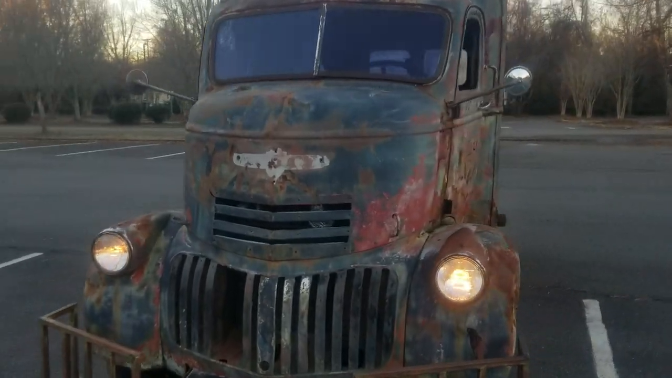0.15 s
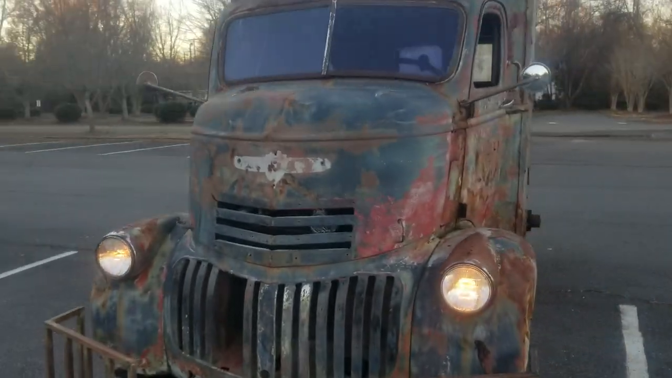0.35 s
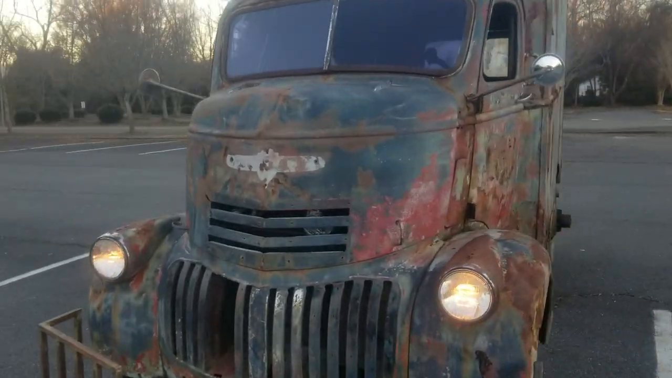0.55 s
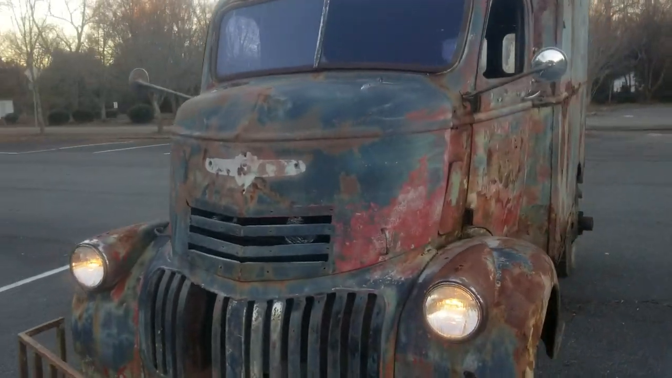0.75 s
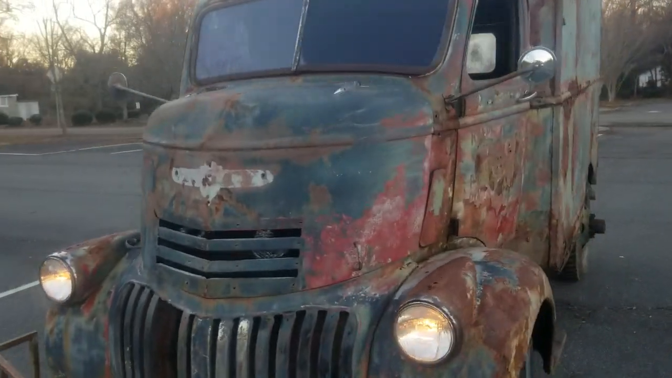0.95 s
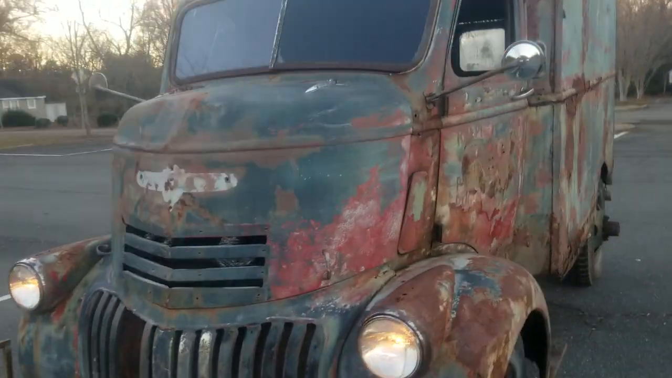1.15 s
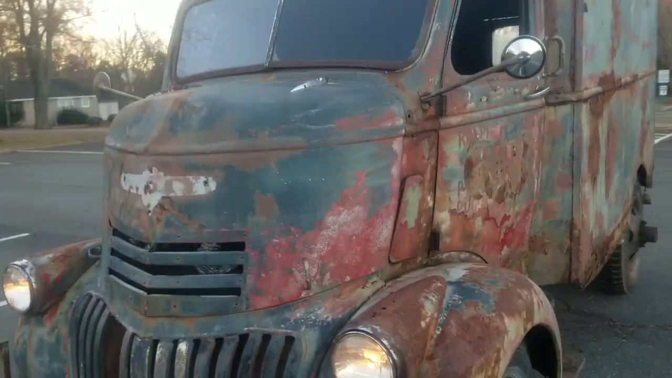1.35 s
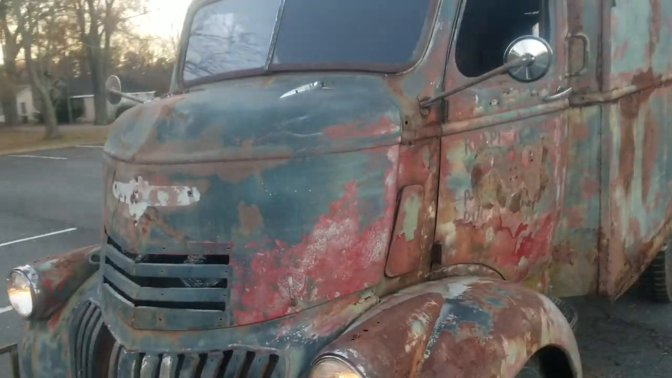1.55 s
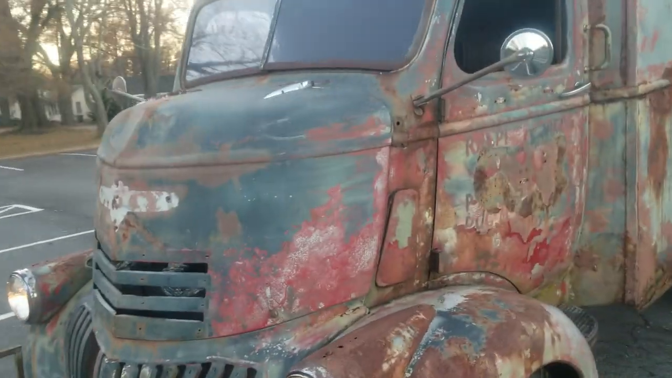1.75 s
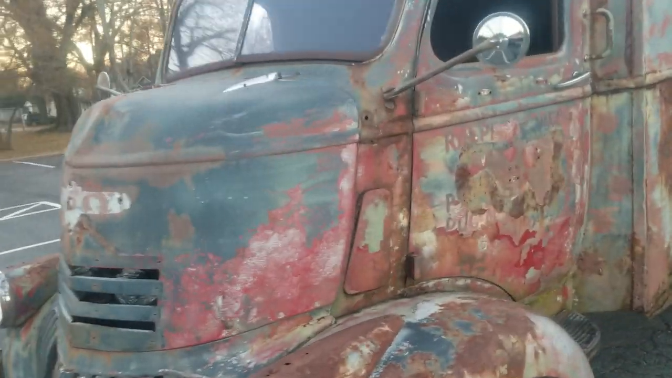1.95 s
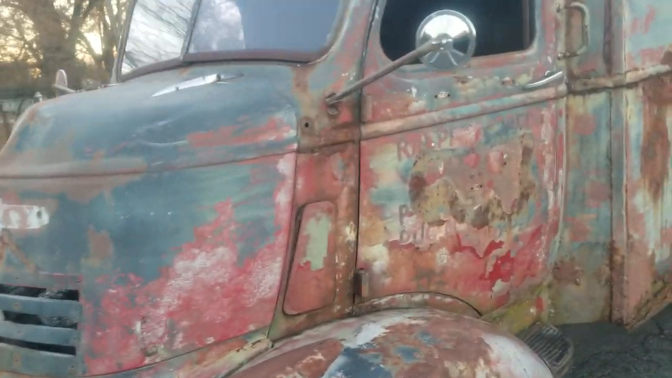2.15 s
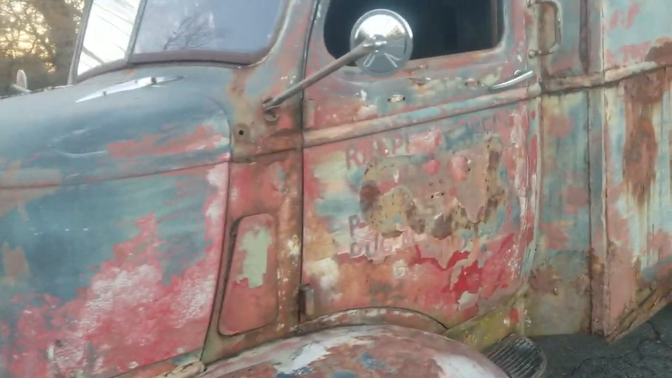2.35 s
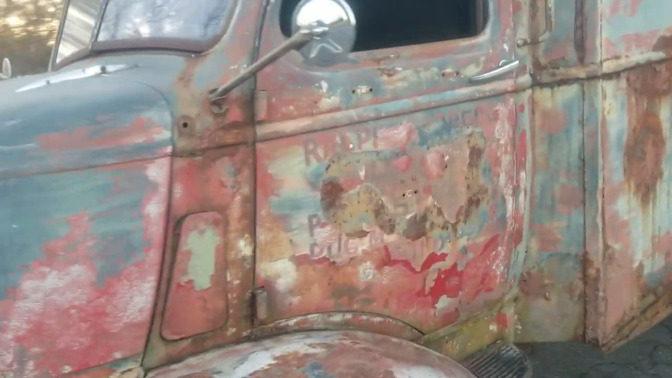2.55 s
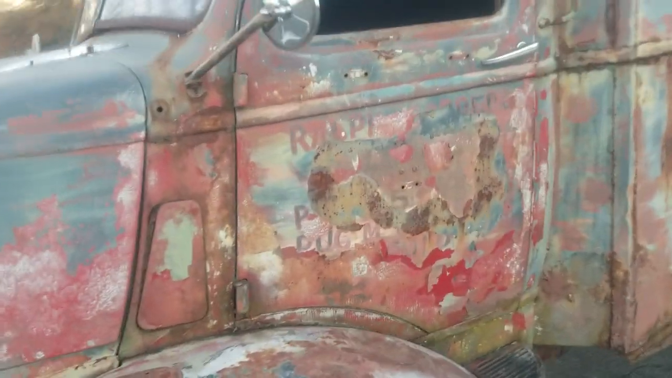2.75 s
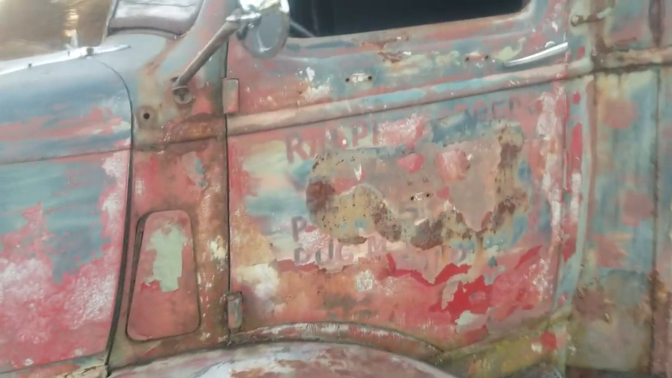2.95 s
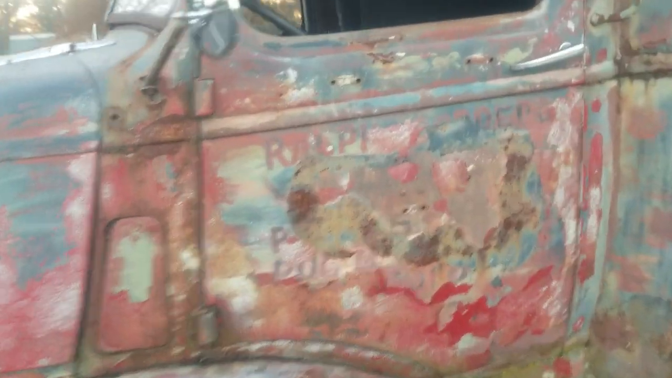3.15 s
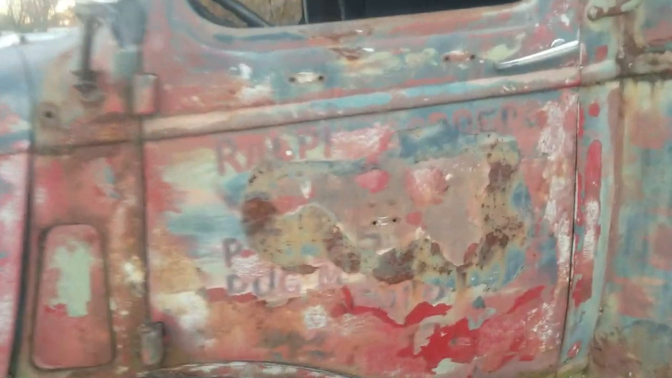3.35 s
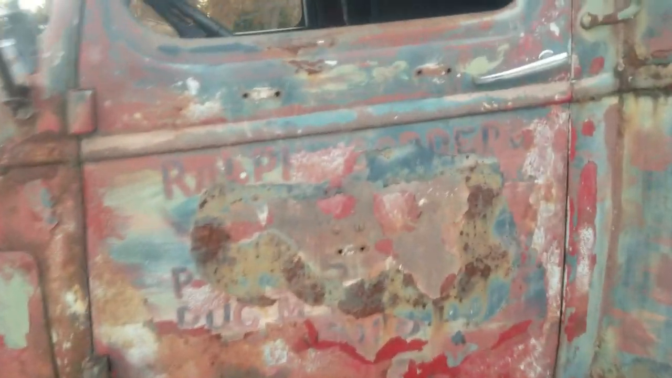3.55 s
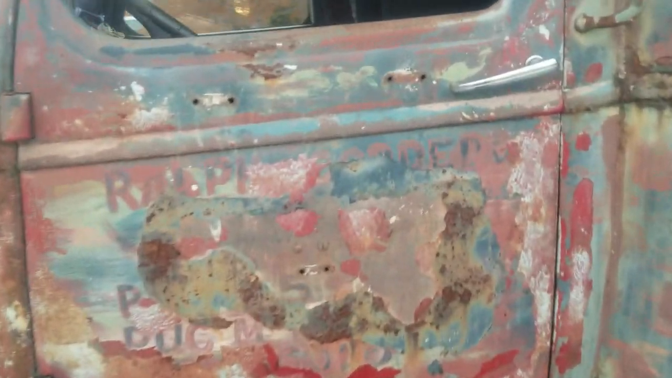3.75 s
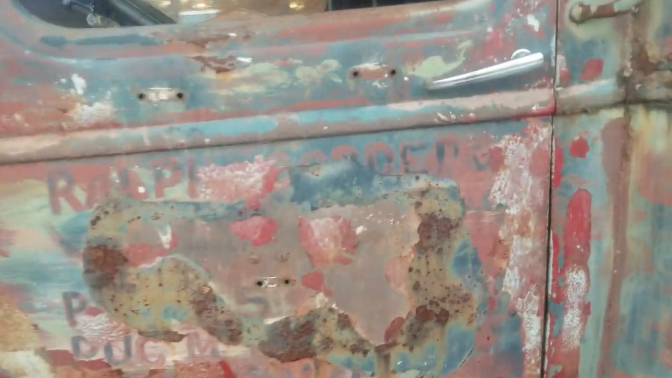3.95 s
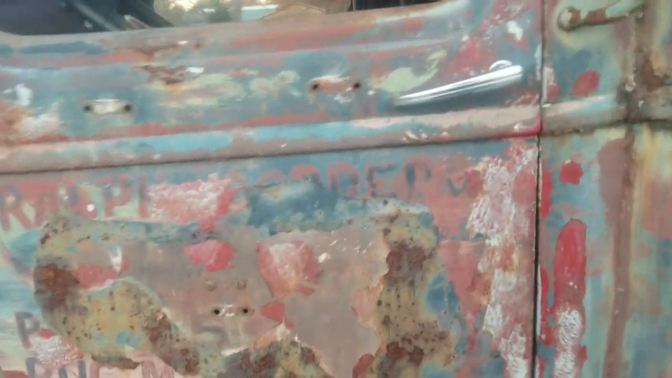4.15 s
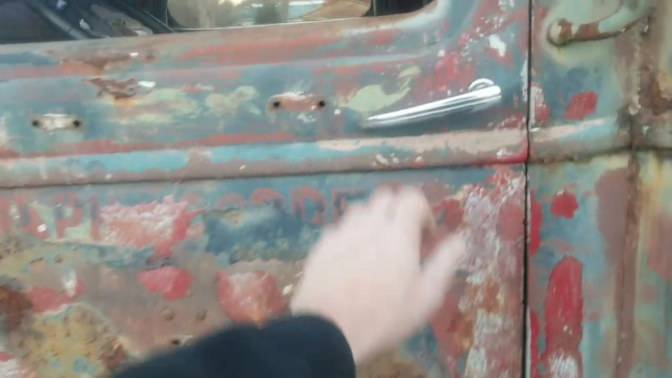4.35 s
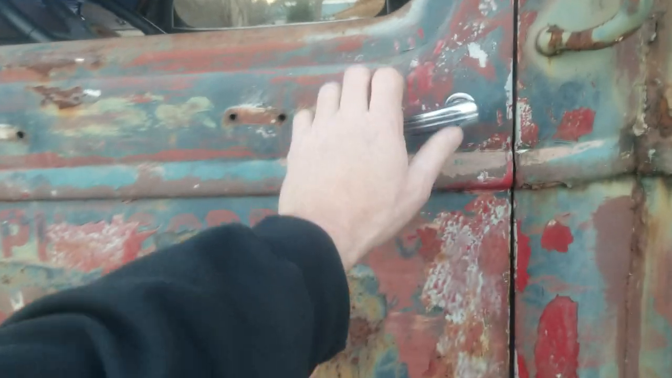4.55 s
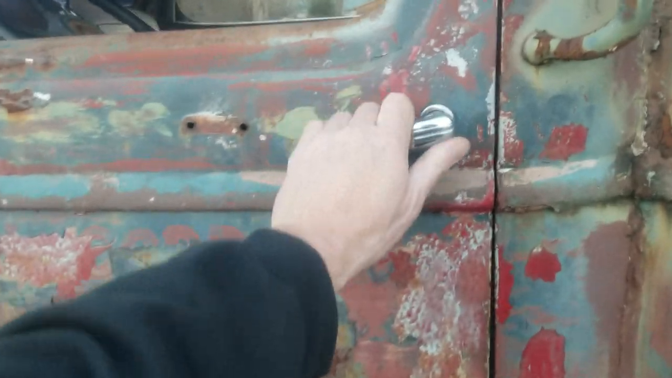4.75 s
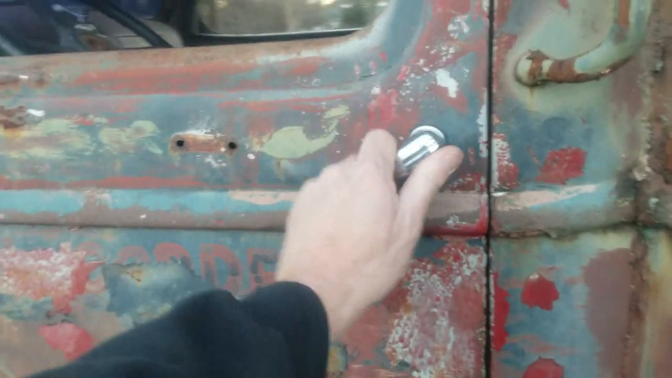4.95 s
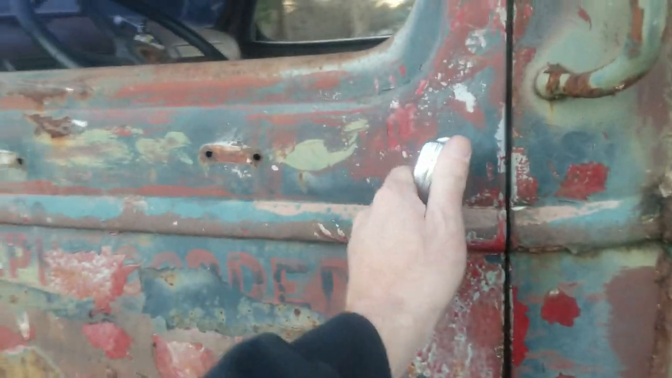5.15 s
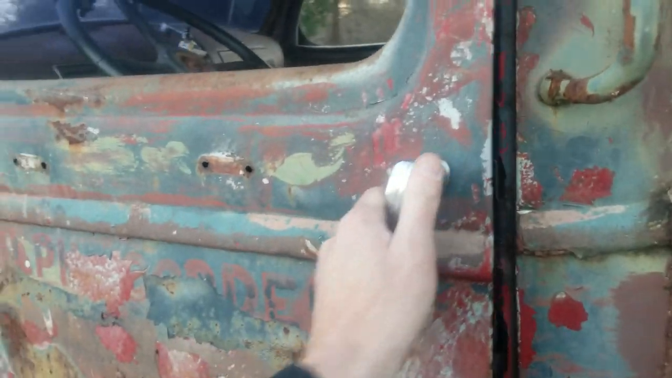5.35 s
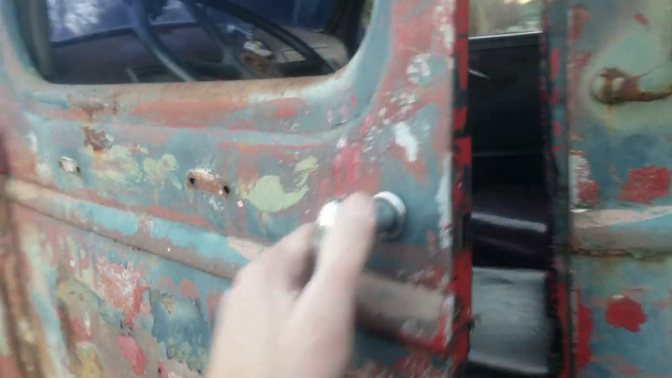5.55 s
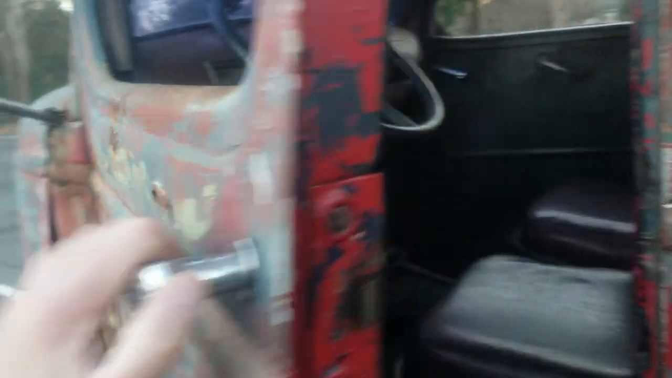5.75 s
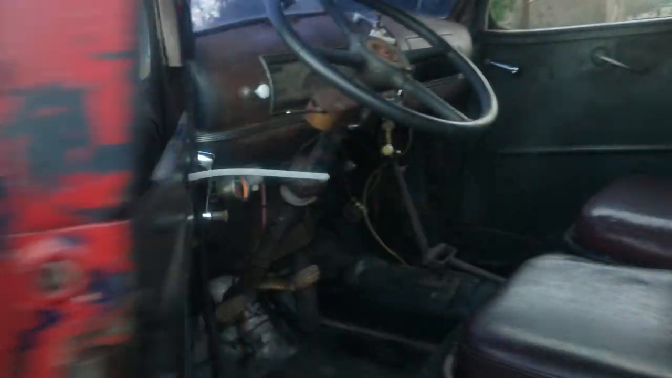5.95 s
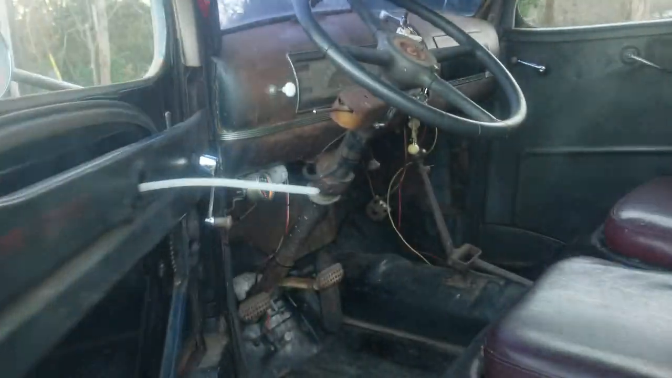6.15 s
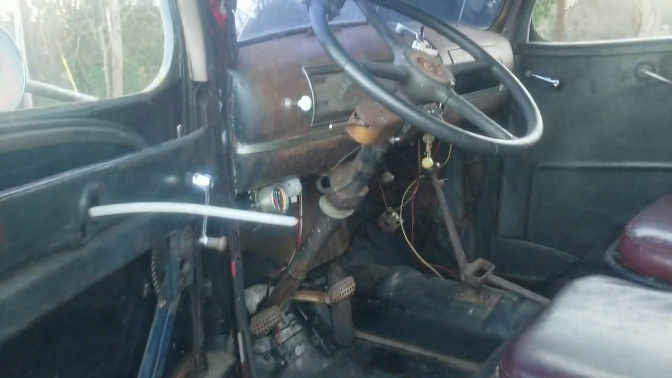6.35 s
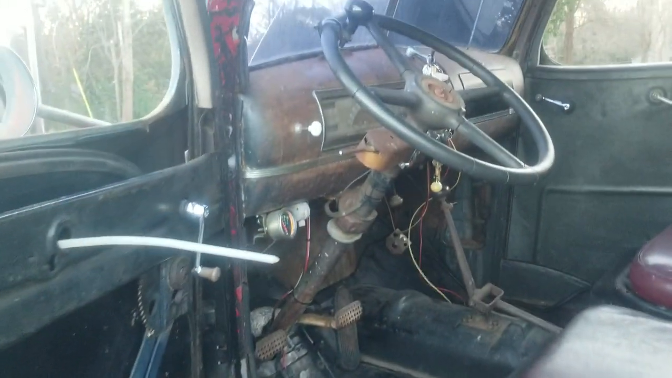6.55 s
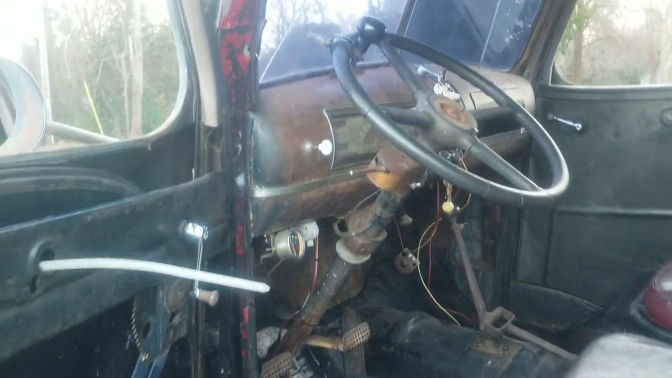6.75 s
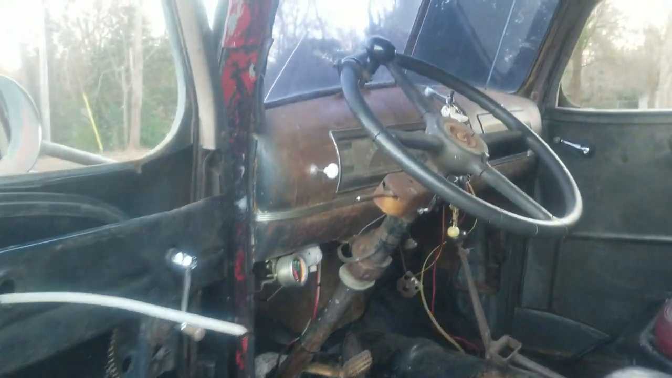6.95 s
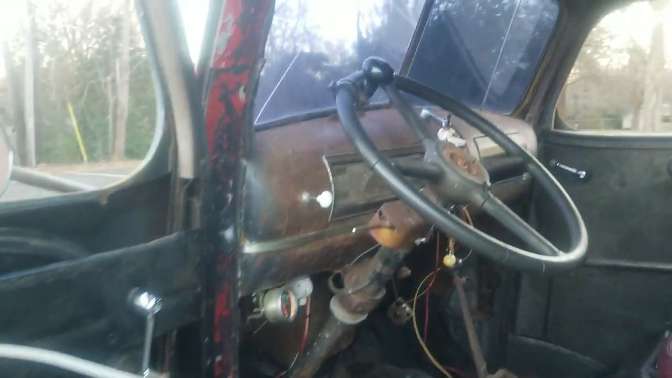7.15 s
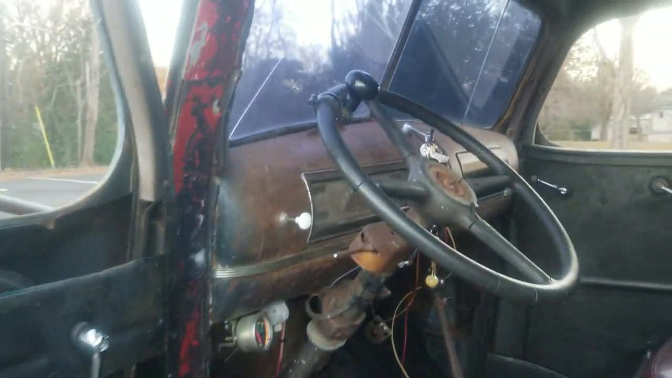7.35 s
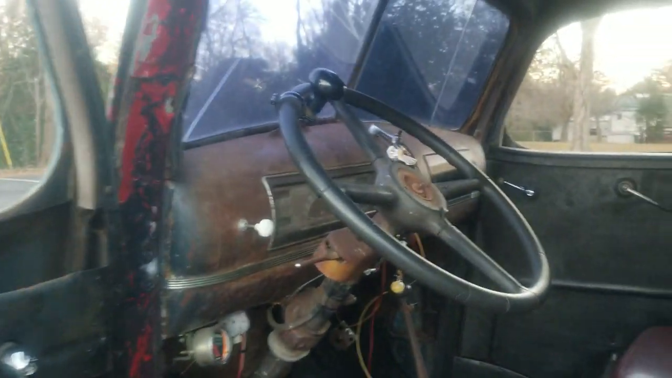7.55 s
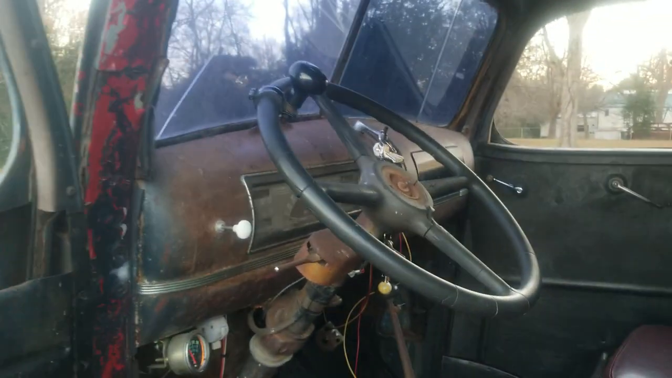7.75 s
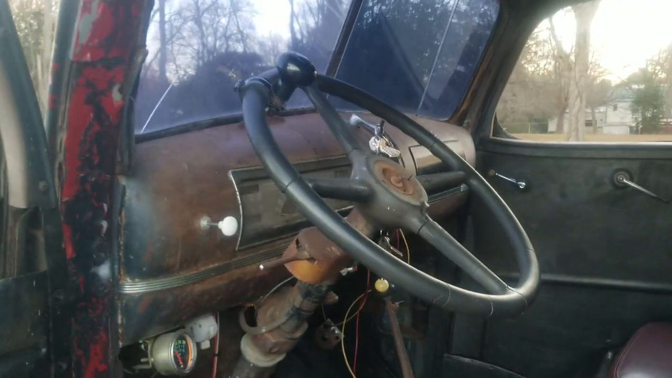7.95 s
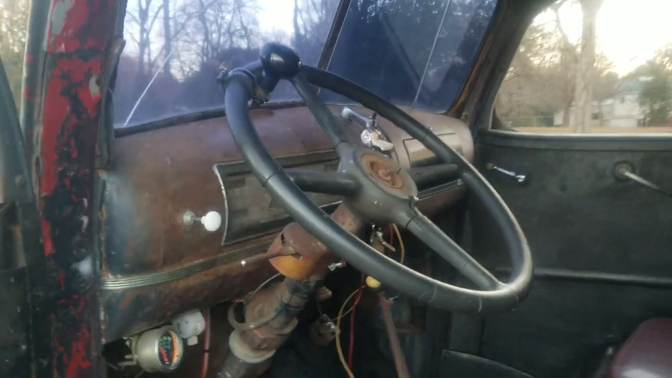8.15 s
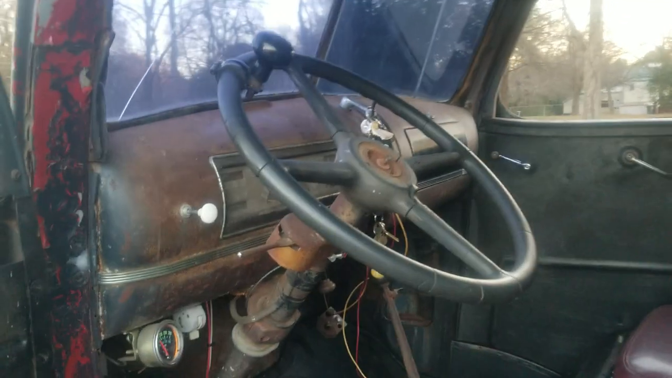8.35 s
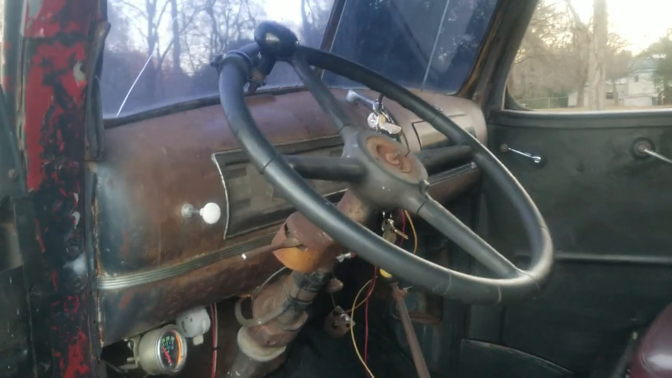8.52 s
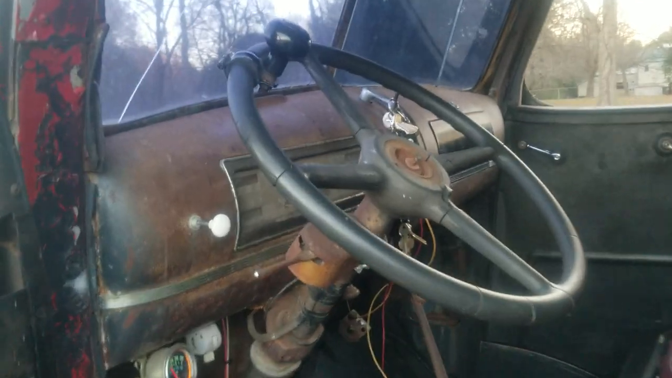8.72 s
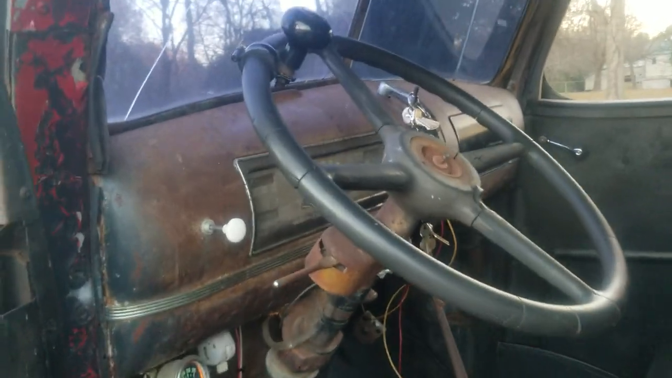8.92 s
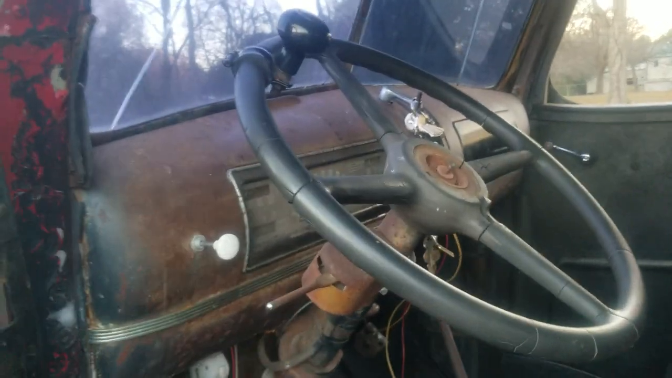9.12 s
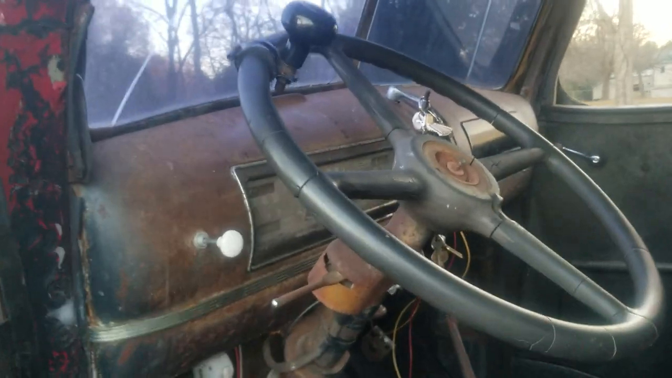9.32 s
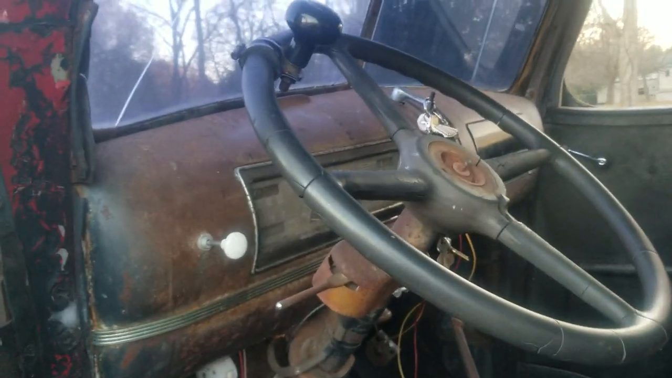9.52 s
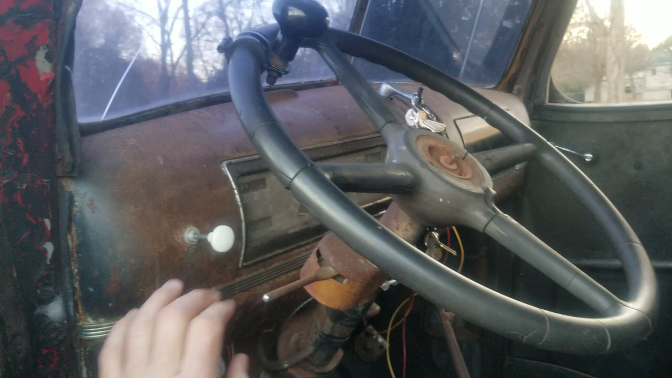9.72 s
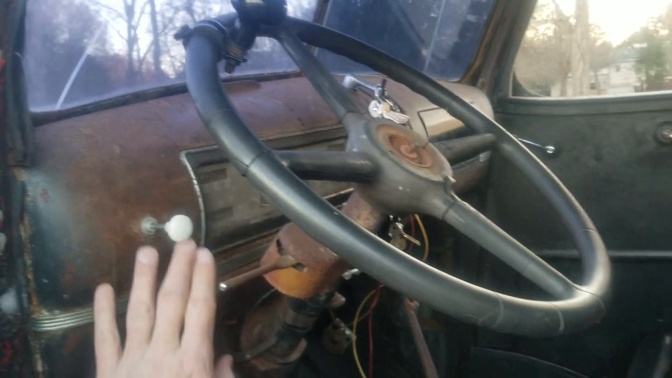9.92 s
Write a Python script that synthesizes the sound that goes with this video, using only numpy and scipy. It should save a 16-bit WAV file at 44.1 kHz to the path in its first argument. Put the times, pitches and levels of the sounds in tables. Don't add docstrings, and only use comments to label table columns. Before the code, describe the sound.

Quiet open car park with soft low traffic rumble, gusty bass and faint airy hiss throughout. A distant engine hum rises from 0 to 3 s, shifts down in pitch at about 3.1 s, climbs again until 7.7 s, then fades into a weak low boom and drone. Faint footsteps at 0.8 and 2.5 s. At 4.4 s, close up, a hand touches the handle: a cluster of small rattles and sharp dry clacks with a short rusty scrape. A loud click at 4.93 s, a springy tick at 5.06 and a second pull at 5.12. At 5.25 s the latch releases with heavy, hollow sheet-metal thuds and bounces; hinges grind until a hard knock at 5.78 and a tiny squeak. Soft rubbing and ticks from 6.2. A sill plate clacks at 7.92, a pedal ticks at 8.62, seat rails snap at 9.02 and 9.38, and a dull knock follows at 9.74 amid rubbing.

```python
import sys
import numpy as np
from scipy import signal
from scipy.fft import rfft, irfft, next_fast_len
from scipy.io import wavfile
from scipy.ndimage import uniform_filter1d

SR = 44100
rng = np.random.default_rng(int(sys.argv[2]) if len(sys.argv) > 2 else 0)


def digitize_waveform(pressure):
    field = np.atleast_2d(pressure).T
    bounded = np.clip(field, -1, 1)
    quanta = np.round(bounded * 32767).astype(np.int16)
    wavfile.write(sys.argv[1], SR, quanta)


def elevation(decibels):
    levels = np.asarray(decibels, float)
    return 10 ** (levels / 20)


N = 440118

# start_s, peak_db, body_db, fizz_db, t60_s (body and fizz relative to the peak)
GRIP_HITS = [
    (4.3862, -37.5, 8, -3, 0.083),
    (4.3973, -37, -9, -34, 0.063),
    (4.4049, -32, -3, -26, 0.071),
    (4.4124, -34, -16, -38, 0.058),
    (4.419, -34.5, -2, -34, 0.056),
    (4.4243, -21, -34, -5, 0.043),
    (4.4335, -24, -9, -5, 0.032),
    (4.44, -29.5, -22, 0.5, 0.015),
]
HANDLE_HITS = [
    (4.9125, -41, 14, -32, .04),
    (4.9203, -42.5, 10, -23, 0.028),
    (4.9243, -32.5, 6, -27, 0.027),
    (4.9338, -20.5, 0.5, -12, 0.042),
    (4.944, -29, 5, -26, 0.03),
    (4.953, -32.5, 1.5, -46, 0.15),
    (5.118, -33, 5.5, 3, 0.034),
    (5.125, -34.5, 4, 3, 0.051),
]
KEEPER_HITS = [
    (5.059, -31, -15, -25, .05),
    (5.0655, -31.5, -11, -17, 0.07),
    (5.075, -35.5, -8, -25, 0.081),
]
LATCH_HITS = [
    (5.251, -34, 10.5, -17, 0.044),
    (5.267, -29, 4.5, -2, 0.045),
    (5.282, -32.5, 6, -29, 0.087),
    (5.317, -38.5, -3, -32, 0.046),
    (5.355, -41, 3, -28, 0.028),
]
STOP_HITS = [
    (5.776, -36, 1, -30, .03),
    (5.781, -26, 0.5, -2.5, 0.03),
    (5.786, -21, -3, -14, 0.09),
]
SILL_HITS = [
    (7.8663, -51, -8, -2, .05),
    (7.8733, -47.5, 5, -4, 0.22),
    (7.9045, -40, -33, -33, 0.063),
    (7.9128, -32, -24, 0, 0.035),
    (7.9185, -28, -9, 1, 0.019),
    (7.9239, -31.5, -24, -2, 0.048),
    (7.9331, -53, -15, -1, .044),
    (7.9674, -52, 16, -34, 0.28),
]
PEDAL_HITS = [
    (8.5597, -57, 2, -10, .02),
    (8.5896, -53, -9, 4, .02),
    (8.608, -48, -8, -17, .015),
    (8.6181, -37, -8, -1, 0.02),
    (8.626, -37.5, -15, -12, 0.017),
    (8.638, -45, -20, -12, .015),
    (8.642, -43, -19, -3, 0.0098),
    (8.6924, -47.5, -22, -6, 0.011),
    (8.7577, -54.5, -23, -3, 0.0088),
]
SEAT_HITS = [
    (9.009, -42, 11, -25, 0.018),
    (9.0158, -26, -13, 12, .03),
    (9.024, -31.5, 7, -19, 0.11),
    (9.0834, -44, 16, -17, 0.039),
    (9.1318, -54, 5, -13, 0.047),
    (9.2889, -63, 5, -10, .03),
    (9.2949, -55.5, 17, -12, .03),
    (9.3758, -31.5, -6, 8.5, 0.041),
    (9.383, -36, 3, -16, 0.082),
    (9.4705, -59, 17, -10, .03),
]
CAB_HITS = [(6.2255, -69, -5, 9, .04), (6.261, -63, 21.5, -10, .08), (6.6456, -48, -20, -3, 0.022),
            (6.6541, -50, -20, -11, 0.037), (6.7179, -54, 10, 3, .03), (6.7299, -51, 2, -8, 0.033),
            (8.939, -49, 18, 3, .12), (8.945, -61, -5, 10, 0.024), (9.654, -59, 22, -40, .12),
            (9.6905, -54, 17, -33, 0.045), (9.696, -52, 19, -33, 0.2), (9.7355, -38, 10, -33, 0.15)]
STEP_HITS = [
    (.805, -53, 3, 4, .025),
    (2.519, -57, 2, -4, .04),
    (2.59, -63, -8, -8, .03),
    (3.092, -63, -10, -14, .03),
    (3.871, -61, -10, -8, .03),
]

# frequency_hz, width_hz, level_db
SPINDLE_MODES = [(760, 200, 14), (1120, 200, -20), (1480, 160, 4), (1740, 410, 1), (2800, 380, -8),
                 (4000, 650, -17)]
LEVER_MODES = [(727, 180, -3), (890, 49, -4), (1127, 84, -3.5), (1304, 82, -4), (1540, 200, 6),
               (1980, 83, -1), (2120, 260, 2.5), (2500, 200, 0), (3360, 120, -4), (3600, 140, 0.5),
               (4100, 910, -5)]
SPRING_MODES = [(754, 200, -7), (1150, 220, -9), (1423, 33, 1), (1540, 61, 3), (2820, 100, -3),
                (3300, 130, -11), (3590, 94, -5), (4530, 470, -8)]
CATCH_MODES = [(695, 425, 12.5), (1300, 510, 6), (1750, 230, 0.5), (2800, 520, 9), (3470, 260, 9.5),
               (3870, 350, 2.5), (4760, 1100, -0.5)]
STRAP_MODES = [(788, 140, 4.5), (340, 34, -2.5), (1050, 22, -9), (1500, 890, -5), (1960, 1200, 12.5),
               (2570, 270, 2), (3194, 620, 3), (4360, 490, 5)]
PLATE_MODES = [(660, 340, 11), (1030, 160, -6.5), (1660, 87, 5.5), (2370, 200, 0), (2750, 130, 2),
               (3920, 720, -1)]
ARM_MODES = [(790, 370, 1), (1150, 270, 6), (1340, 250, 2.5), (1750, 1050, 6.5), (2680, 280, -6),
             (3870, 1600, -2)]
RAIL_MODES = [(335, 45, -1.5), (646, 68, 0), (855, 56, -2.5), (1150, 220, -1), (1760, 660, -13),
              (2720, 210, 2.5), (3540, 700, 0), (5020, 280, -1.5), (7400, 350, -6)]
TRIM_MODES = [(704, 170, 3), (1150, 440, -4), (1670, 320, -6), (2600, 300, 1.5), (3370, 1300, 0.5),
              (4400, 1200, -3)]
SOLE_MODES = [(850, 900, 0), (1300, 600, 4), (1920, 400, 11), (3900, 900, 4)]
# frequency_hz, width_hz, level_db
PANEL_MODES = [(123, 67, 0), (158.2, 8.9, -0.5), (207, 17, -7.5), (287, 24, -9.5), (366, 39, -8),
               (451, 140, -12.5)]
# frequency_hz, width_hz, level_db
FIZZ_MODES = [(7640, 1900, 12), (8400, 150, 4), (11650, 1500, -2.5), (14800, 1100, -14)]

# start_s, peak_db, pitch_hz, t60_s
KNOCKS = [(4.3965, -26, 1500, .03), (4.4052, -25, 1550, .03), (4.4203, -23, 1500, .02),
          (4.4287, -13.5, 1580, 0.028), (4.436, -26, 1480, .018), (4.3882, -27, 1500, .02),
          (4.9343, -14, 2560, .003), (4.941, -19, 1150, .02), (5.2515, -28, 3600, 0.028),
          (8.6173, -28, 1450, .02), (8.643, -32, 1450, .015), (4.427, -20, 1490, 0.011),
          (4.4334, -9, 1500, .011), (4.9336, -12, 1390, 0.0062), (4.9365, -25, 1460, .008),
          (5.066, -39, 1440, 0.054), (5.066, -37, 2820, .06), (5.2675, -24.5, 3580, 0.027),
          (5.281, -28, 3600, 0.027), (5.3165, -37, 3600, .03), (5.3545, -44, 3590, 0.026),
          (7.9185, -18, 1660, 0.028), (7.9187, -18, 2750, 0.017), (7.914, -29, 2500, .015),
          (7.925, -20, 1720, 0.018), (9.0173, -26, 2650, 0.011)]
# start_s, peak_db
THUDS = [(4.934, -35), (5.116, -29), (5.245, -11), (5.253, -15.5), (5.26, -13.5), (5.266, -29),
         (5.281, -17.5), (5.296, -22), (5.314, -24), (5.354, -30), (5.373, -33), (5.7813, -34.5),
         (8.6188, -32), (9.023, -35), (9.738, -32)]
# start_s, peak_db
RAPS = [
    (2.519, -28),
    (4.934, -23),
    (4.94, -25),
    (4.97, -24),
    (4.989, -28),
    (5.026, -30),
    (5.14, -29),
]
# start_s, level_db
TUGS = [
    (4.929, -25.5),
    (5.099, -33.5),
    (5.24, -25.5),
]

# start_s, length_s, first_db, last_db
GRINDS = [(4.45, 0.083, -36.5, -86), (4.51, 0.14, -58.5, -61.5), (4.8, 0.081, -62, -57),
          (4.9, 0.04, -56, -40), (4.97, 0.084, -57, -44), (5.085, 0.049, -66, -37), (5.14, 0.13, -52, -47),
          (5.29, 0.14, -41, -63), (5.42, 0.16, -61, -61), (5.57, 0.062, -54, -45.5),
          (5.64, 0.13, -48, -49.5), (5.81, 0.075, -47, -54), (5.885, .2, -57.5, -74)]
# start_s, length_s, first_db,
# last_db
RUBS = [(6.17, 0.1, -71, -60), (6.27, .22, -60.5, -71.5), (6.5, 0.25, -63.5, -55.5),
        (6.75, 0.17, -58, -66.5), (8.56, 0.049, -64, -53), (8.62, 0.14, -53, -69), (8.95, 0.079, -56, -51),
        (9.03, 0.218, -46, -51.5), (9.25, 0.125, -53.5, -48), (9.39, 0.23, -47, -55),
        (9.61, 0.12, -55, -49.5), (9.74, 0.24, -49, -57),
        (7.83, .09, -60, -50),
    (7.92, .17, -48, -68),
]
# start_s, length_s, pitch_hz, level_db
SQUEAK = (5.835, .075, 5530, -62)
# frequency_hz, density_db
GRIT_COLOUR = [(350, -29), (500, -25), (730, -5.5), (1200, -10), (1900, -6), (3100, -10), (4500, -15.5),
               (6000, -28), (7700, -17), (9600, -37), (11200, -26.5), (16000, -36)]
# frequency_hz, density_db
RUB_COLOUR = [(350, -29), (500, -15.5), (730, -18), (1200, -20), (1900, -9.5), (3100, -17.5), (4500, -17.5),
              (6000, -22), (6900, -23.5), (7600, -18), (8500, -26), (9800, -31.5), (12500, -27.5),
              (16000, -31)]

# time_s, firing_pitch_hz, effort_db
GEARS = [
    [(0.0, 113.7, -47.5), (0.8, 127.4, -42), (1.4, 140, -51), (1.94, 156, -38.5), (2.3, 158.4, -43),
     (2.75, 157.7, -46.5), (2.95, 161, -44)],
    [(3.15, 107.3, -15), (3.24, 110.7, -36.5), (3.9, 118.6, -41.5), (4.3, 121.2, -35.5), (4.7, 123, -42.5),
     (5.45, 129.6, -39.5), (5.9, 142.6, -40), (6.25, 146.2, -36), (7.1, 156.1, -37), (7.3, 157.4, -43.5),
     (7.7, 156, -42.5)],
]
# multiple_of_firing_pitch, level_db, slope_db_per_db_of_effort
UPPER_ORDERS = [(2, 3.5, .4), (2.5, -5, 1.5), (3, -7, 1.5), (3.5, 4.5, 2), (4.5, -4, 1.2)]
# time_s, pitch_hz, level_db
DRONE = [(7.85, 391.4, -55), (8.3, 380, -62), (8.9, 369, -59.5)]
# time_s, pitch_hz, level_db
BOOM = [(7.7, 140, -37.5), (8.3, 139, -49), (8.9, 138.5, -49.5), (9.4, 139, -47), (9.98, 139.5, -38.5)]

# time_s, level_db
SWELL = [(0.0, 2), (1.5, 2.5), (3.201, 1), (4.699, 3), (5.6, 4), (7.4, 2), (8.7, -0.5), (9.98, 3.5)]
# frequency_hz, density_db
RUMBLE_COLOUR = [(12, -68), (20, -17), (64, -3), (104, -4), (164, -11.5), (244, -18), (374, -20.5),
                 (408, -26.5), (492, -26.5), (1200, -34.5), (1560, -91.5), (2640, -120)]
# frequency_hz, density_db
AIR_COLOUR = [(700, -30), (1000, 0), (1300, -4), (1650, -8), (1950, -3), (2250, -8), (2500, -16),
              (3400, -19), (3900, -12), (5100, -14), (5600, -25), (10000, -27), (12500, -23), (16000, -27)]
# frequency_hz, correlation
LIKENESS = [(60, .96), (130, .96), (290, .87), (640, .4), (1400, .1), (3100, -.1), (6800, -.1), (15000, 0)]
# frequency_hz, left_over_right_db
PORTS = [(300, 0), (700, .5), (1300, 2.5), (2400, -.5), (4400, -3), (8100, -2.5), (13000, 2)]

EDGE_HZ = 15900

# hits, modes, far_ear_gain, snap_gain, air_db
PARTS = [
    (STEP_HITS, SOLE_MODES, .3, .1, 0.1),
    (GRIP_HITS, SPINDLE_MODES, -.1, .9, 0.1),
    (HANDLE_HITS, LEVER_MODES, -.5, 1.5, -3.0),
    (KEEPER_HITS, SPRING_MODES, -.1, .4, -6.0),
    (LATCH_HITS, CATCH_MODES, -.9, 1.5, -4.0),
    (STOP_HITS, STRAP_MODES, -.5, 1.5, -9.0),
    (PEDAL_HITS, ARM_MODES, .5, 1.5, -6.0),
    (SILL_HITS, PLATE_MODES, -.5, .3, -3.0),
    (CAB_HITS, TRIM_MODES, .5, .9, 0.1),
    (SEAT_HITS, RAIL_MODES, .3, 1.5, 3.0),
]


def evened(x):
    return x / np.sqrt(np.mean(x ** 2) + 1e-20)


def read(points, hz):
    f, value = np.transpose(points)
    return np.interp(np.log(hz + 1), np.log(f + 1), value)


def add(mix, start_s, sound):
    part = mix[:, round(start_s * SR):][:, :sound.shape[-1]]
    part += sound[..., :part.shape[1]]


def curves(rows):
    s, *columns = np.transpose(rows)
    t = np.arange(s[0], s[-1], 1 / SR)
    return s[0], [np.interp(t, s, c) for c in columns]


def wander(size, hz):
    full = next_fast_len(size)
    spectrum = rfft(rng.standard_normal(full))
    lowpass = 1 + (np.fft.rfftfreq(full, 1 / SR) / hz) ** 2
    return evened(irfft(spectrum / lowpass, full)[:size])


def noise(colour, patchy_db):
    hz = np.fft.rfftfreq(1024, 1 / SR)
    a, b, c, d, patches = rng.standard_normal((N // 256 + 5, 513, 5)).T
    patches = uniform_filter1d(patches, size=8, axis=0)
    patches = evened(uniform_filter1d(patches, size=14, axis=1))
    same = np.clip(read(LIKENESS, hz), -1, 1)[:, None]
    left = a + 1j * b
    right = same * left + np.sqrt(1 - same ** 2) * (c + 1j * d)
    level = elevation(read(colour, hz)[:, None] + patchy_db * patches) * (hz < EDGE_HZ)[:, None]
    z = np.array([left, right]) * level
    return evened(signal.istft(z, nperseg=1024, noverlap=768)[1][:, :N])


def ring(drive, modes):
    out = 0
    for k, (hz, width, db) in enumerate(modes):
        pole = np.exp((2j * np.pi * hz - np.pi * abs(width)) / SR)
        mode = signal.lfilter([0, pole.imag], [1, -2 * pole.real, abs(pole) ** 2], drive)
        out = out + (-1) ** k * elevation(db) * np.sqrt(1 - abs(pole)) * mode
    return out / abs(out).max()


def tone(hz, rough):
    flutter = 1 + rough * (wander(len(hz), 11.8) + 1j * wander(len(hz), 0.87))
    wave = (flutter * np.exp(2j * np.pi * np.cumsum(hz) / SR)).real
    return evened(wave) * signal.windows.tukey(len(hz), .08)


def hit(row, modes, far_ear, snap, air_db):
    start_s, peak_db, body_db, fizz_db, t60_s = row
    body_lingers, fizz_rate, split_hz = 2.1, 0.86, 1300
    t = np.arange(round(.24 * SR)) / SR
    both, rattle, *apart = rng.standard_normal((4, len(t)))
    apart, ears = np.array(apart), np.array([[1], [far_ear]])
    grains = elevation(0.5 * evened(uniform_filter1d(rattle, size=90)))
    burst = (both * ears + apart) * grains * (1 - np.exp(-t / 0.0014))
    burst = burst + snap * ears * np.exp(-t / 0.00013)
    decay = elevation(-60 * t / max(t60_s, .01)) + elevation(-36 - 60 * t / .3)

    part = ring(burst * decay, [m for m in modes if m[0] > split_hz])
    crack = ring(ring(burst * decay, [(2750, 2200, 0)]), [(2500, 7100, 0)])
    push = (both + .55 * apart) * decay ** (1 / body_lingers) * (1 - np.exp(-t / 0.002))
    body = ring(push, [m for m in modes if m[0] <= split_hz])
    airy = [(f, w, g + air_db * (f > SR / 4)) for f, w, g in FIZZ_MODES]
    fizz = ring(np.diff(burst * decay ** fizz_rate, prepend=0), airy)
    fizz_gain = elevation(fizz_db + np.array([[-1.5], [1.5]]))
    return start_s, elevation(peak_db) * (4.33 * part + 1.93 * crack + elevation(body_db) * body + fizz_gain * fizz)


def knocks():
    out, t = np.zeros((2, N)), np.arange(SR // 20) / SR
    for start_s, db, hz, t60_s in KNOCKS:
        add(out, start_s, -elevation(db - 60 * t / t60_s) * np.sin(2 * np.pi * hz * t))
    return out


def thuds():
    out, t = np.zeros((2, N)), np.arange(SR // 2) / SR
    thud = ring(np.diff(t * np.exp(-t / 0.0024), prepend=0), PANEL_MODES)
    for start_s, db in THUDS:
        add(out, start_s, -elevation(db) * thud)
    damped = [(f, 2.8 * w, g) for f, w, g in PANEL_MODES[2:]]
    rap = ring(np.diff(t * np.exp(-t / 0.0012), prepend=0), damped)
    for start_s, db in RAPS:
        add(out, start_s, -elevation(db) * rap)
    return out


def shudder():
    rise_s, t60_s = 0.0085, 0.81
    out, t = np.zeros((2, N)), np.arange(SR // 2) / SR
    for start_s, db in TUGS:
        skin = evened(ring(rng.standard_normal(len(t)), PANEL_MODES[1:]))
        add(out, start_s, np.minimum(t / rise_s, 1) * elevation(db - 60 * t / t60_s) * skin)
    return out


def drag(strokes, colour, grain_db):
    level = np.zeros((2, N))
    for start_s, length_s, first_db, last_db in strokes:
        add(level, start_s, elevation(np.linspace(first_db, last_db, num=round(length_s * SR))))
    edge = np.hanning(round(.04 * SR))
    level = abs(signal.oaconvolve(level, edge[None] / edge.sum(), "same"))
    return level * evened(noise(colour, patchy_db=0.5) * elevation(grain_db * wander(N, 85.0)))


def scrapes():
    out = drag(GRINDS, GRIT_COLOUR, grain_db=0.5)
    out = out + drag(RUBS, RUB_COLOUR, grain_db=0.0)
    start_s, length_s, hz, db = SQUEAK
    size = round(length_s * SR)
    envelope = np.interp(np.linspace(0, 1, num=size), [0, .6, 1], [.1, 1, 0]) ** 1.5
    add(out, start_s, elevation(db) * envelope * tone(np.full(size, hz), rough=.45))
    return out


def engine():
    upper_db, db_per_hz, full_hz = -22, 1.1, 152.8
    full_db = -37
    throb_share, throb_depth = .145, .5
    out = np.zeros((2, N))
    for rows in GEARS:
        start_s, (hz, effort_db) = curves(rows)
        rough = np.interp(start_s, [0, 3], [.7, .4])
        add(out, start_s, elevation(effort_db) * tone(hz, rough))
        shut_db = db_per_hz * np.minimum(hz - full_hz, 0)
        far_db = np.interp(start_s, [0, 3], [-4, 0])
        throb = 1 + throb_depth * np.cos(2 * np.pi * np.cumsum(throb_share * hz) / SR)
        for order, db, steep in UPPER_ORDERS:
            level_db = full_db + upper_db + far_db + db + steep * np.minimum(effort_db - full_db, 1)
            level_db = level_db + (order > 2) * shut_db
            add(out, start_s, elevation(level_db) * throb * tone(order * hz, rough=0.2))
    start_s, (hz, db) = curves(DRONE)
    add(out, start_s, elevation(db) * tone(hz, rough=0.35))
    start_s, (hz, db) = curves(BOOM)
    add(out, start_s, elevation(db - 0.5) * tone(hz, rough=13.0))
    return out


def traffic():
    swell_db = np.interp(np.arange(N) / SR, *np.transpose(SWELL))
    low = noise(RUMBLE_COLOUR, patchy_db=1.5)
    deep = signal.sosfiltfilt(signal.butter(2, 100, fs=SR, output="sos"), low)
    roar = elevation(swell_db - 48.5) * evened(low - deep)
    gust_db = 2 * wander(N, 1.5)
    boom = elevation(swell_db - 52.5 + gust_db) * evened(deep)
    hiss = elevation(-63.5) * noise(AIR_COLOUR, patchy_db=1.0)
    return roar + boom + hiss


def scene():
    mix = engine() + traffic() + scrapes() + shudder() + thuds() + knocks()
    for rows, modes, far_ear, snap, air_db in PARTS:
        for row in rows:
            add(mix, *hit(row, modes, far_ear, snap, air_db))
    return mix


def top_cut(x):
    return signal.sosfilt(signal.butter(12, 17000, fs=SR, output="sos"), x)


def record(dry):
    hz = np.fft.rfftfreq(N, 1 / SR)
    lead_s = 4 / SR / (1 + (hz / 2000) ** 2)
    tilt = elevation(read(PORTS, hz) / 2) * np.exp(1j * np.pi * hz * lead_s)
    ports = irfft(rfft(dry) * [tilt, 1 / tilt], N)
    cut = signal.sosfilt(signal.butter(2, 42.0, "high", fs=SR, output="sos"), ports)
    cut = signal.sosfiltfilt(signal.cheby2(10, 30, EDGE_HZ * 1.065, fs=SR, output="sos"), cut)
    return top_cut(cut)


dry = scene()
out = record(dry)
digitize_waveform(out)
```